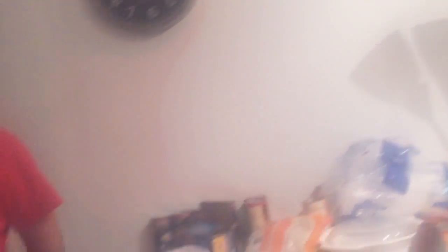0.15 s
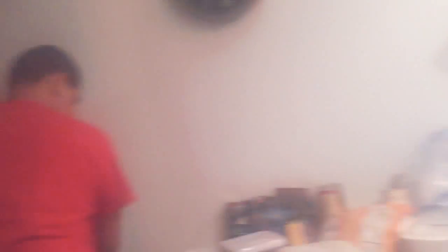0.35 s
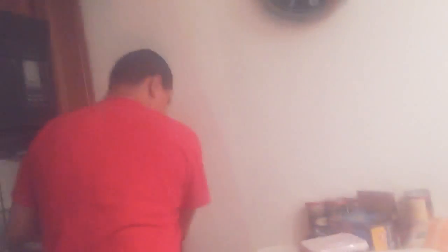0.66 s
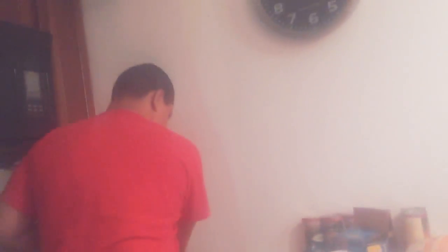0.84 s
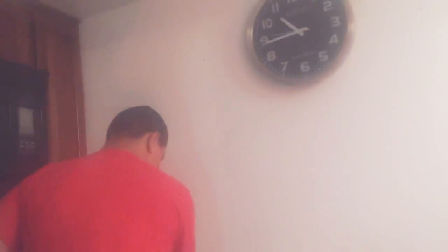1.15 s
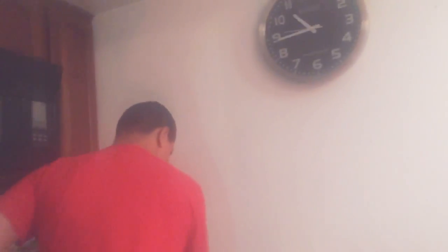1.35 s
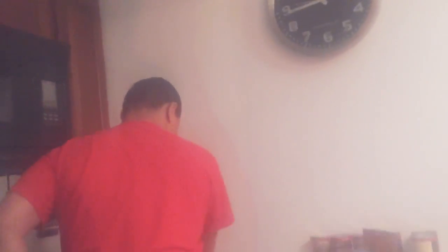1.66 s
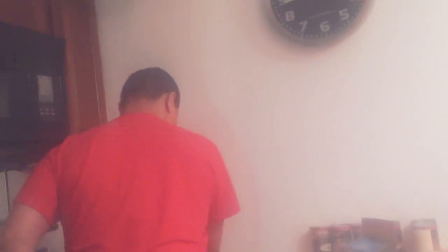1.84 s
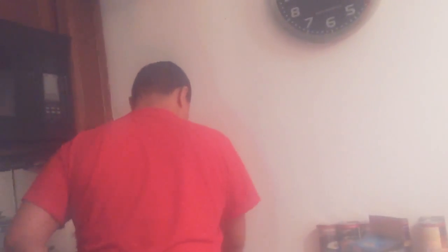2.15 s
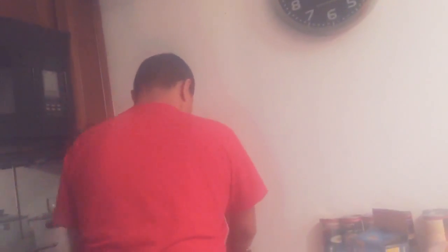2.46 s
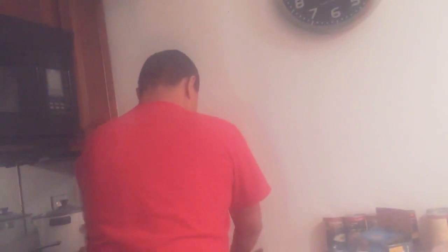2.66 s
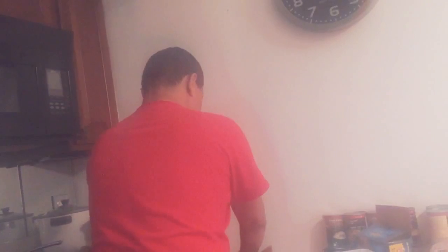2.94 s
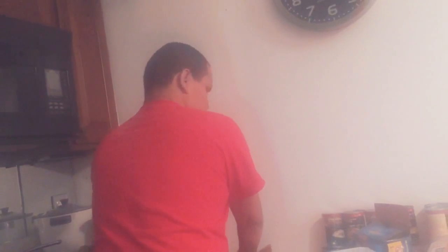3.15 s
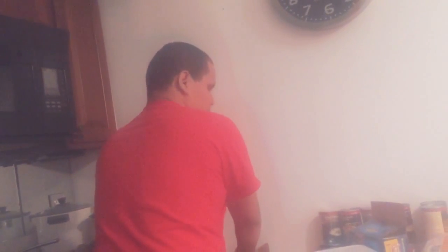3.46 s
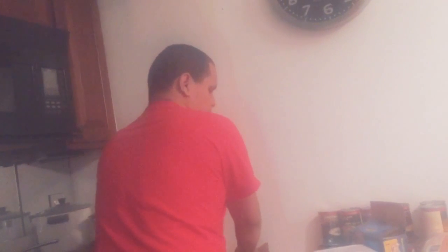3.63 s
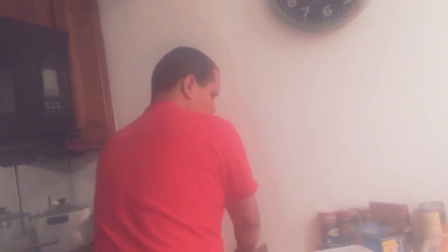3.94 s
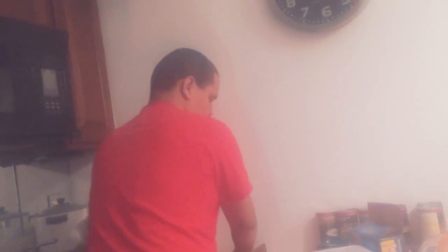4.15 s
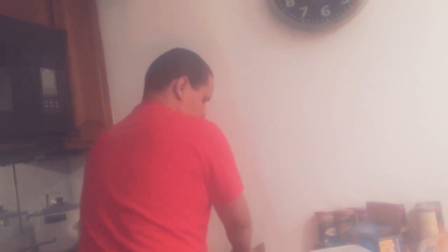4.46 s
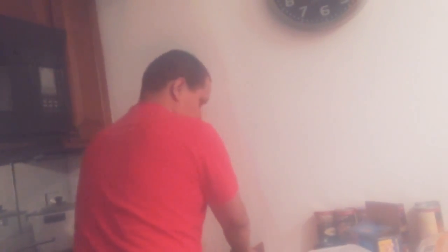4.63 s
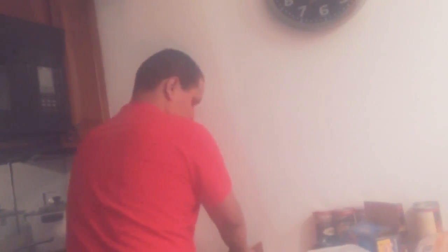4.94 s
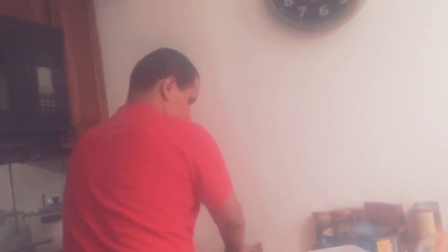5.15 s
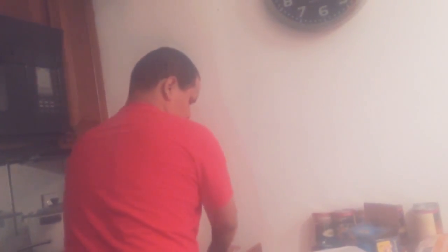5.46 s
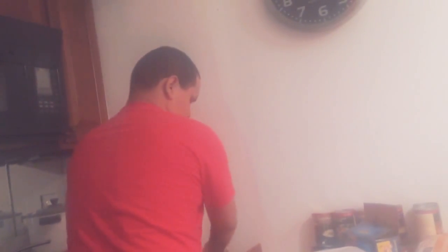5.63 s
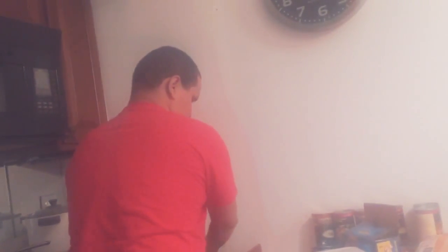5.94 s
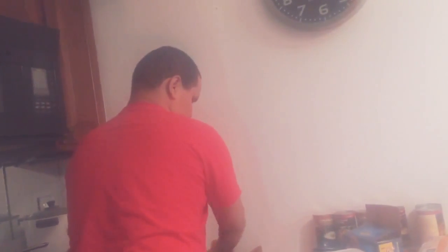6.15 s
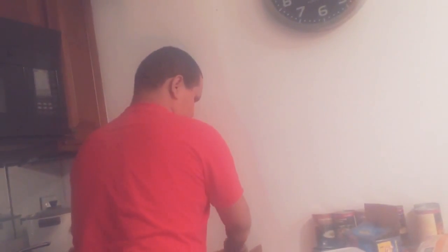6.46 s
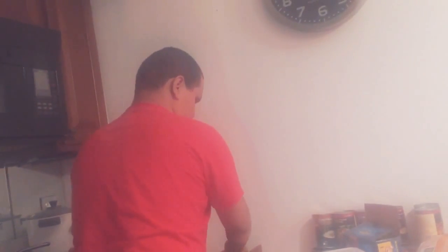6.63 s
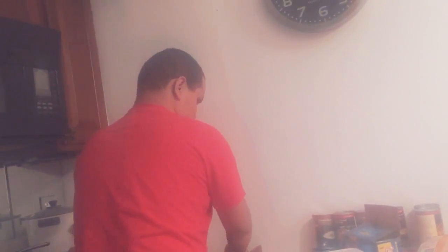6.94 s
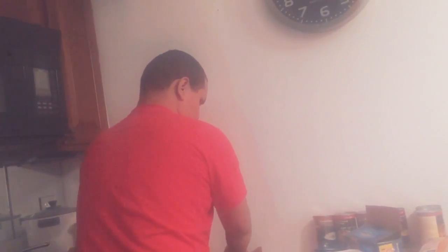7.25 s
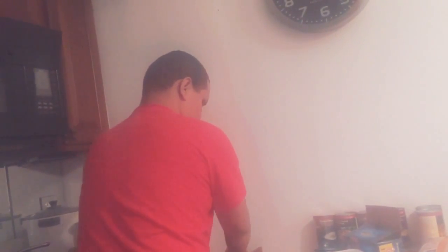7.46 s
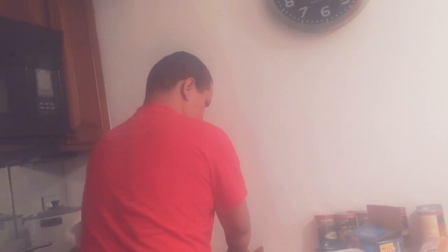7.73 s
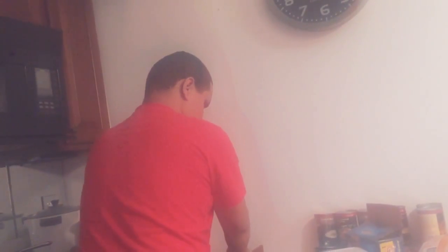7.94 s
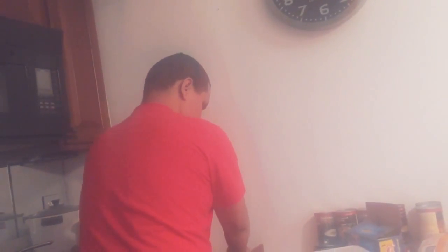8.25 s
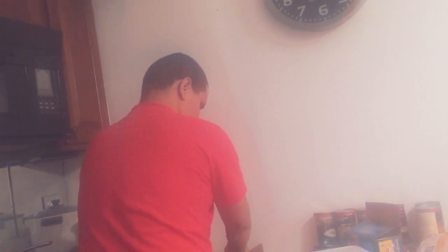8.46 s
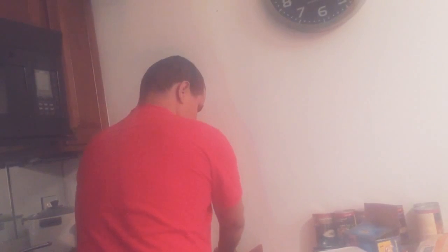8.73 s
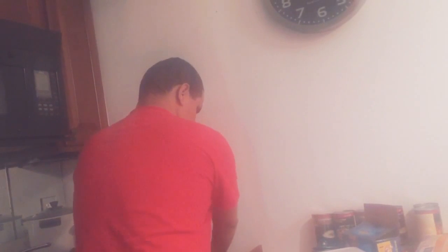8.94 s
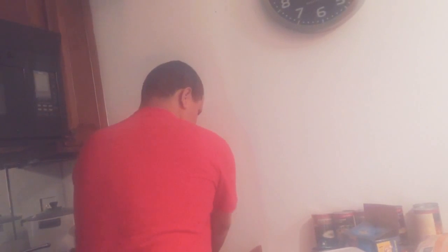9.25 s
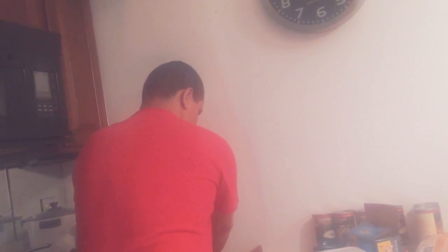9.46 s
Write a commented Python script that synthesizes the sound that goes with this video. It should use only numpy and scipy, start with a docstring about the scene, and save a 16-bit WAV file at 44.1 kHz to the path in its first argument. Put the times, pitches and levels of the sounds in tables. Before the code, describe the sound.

Metal blades clink sharply and handles knock a hard counter in scattered flurries, with brief scrapes and a quiet low hum beneath.

```python
"""Knives on a kitchen counter

Steel knives are sorted and put down in bursts, a few metres away in a small hard-walled room.
Struck blades, handles and counter top are sets of dying sine modes, each with a short crack.
Sine modes also make short single tones and a free ring; shaped noise makes slides; a low sine, cabinet bumps.
An appliance hums underneath: wavering sines over patchy fan noise."""
import sys
import numpy as np
from scipy import signal
from scipy.fft import rfft, irfft, next_fast_len
from scipy.io import wavfile
from scipy.ndimage import uniform_filter1d, map_coordinates

SR = 44100
rng = np.random.default_rng(int(sys.argv[2]) if len(sys.argv) > 2 else 0)


def dump(signal):
    """Clip the signal to [-1, 1] and save it as 16-bit WAV at the path in sys.argv[1]."""
    limited = np.clip(np.atleast_2d(signal).T, -1, 1)
    pcm = np.round(limited * 32767).astype(np.int16)
    wavfile.write(sys.argv[1], SR, pcm)


N = 422919

# Blade clashes: [t/s, blade level/dB, handle clack level/dB, clack f/Hz,
#  level change of the two favoured blade modes/dB, first favoured f/Hz, second favoured f/Hz]
CLINKS = [(1.901, -53.5, -64, 1650.0, -3, 1663.0, 5556.0), (2.372, -61.5, -58.0, 1740, 3, 6686.0, 1663.0),
          (3.04, -42.5, -47, 960.0, 2.5, 9249.0, 13717.0), (3.06, -40.0, -41, 940.0, -8, 9249.0, 13932.0),
          (3.182, -47, -48.5, 1470, -3, 10067.0, 14140.0), (3.464, -54.5, -46.5, 1460, -1, 11445.0, 5787.0),
          (3.521, -58.5, -50, 940.0, 1, 8800.0, 2541.0),
          (3.555, -55.5, -43.5, 1490.0, -2.5, 5556.0, 2541.0),
          (3.584, -29.0, -28.5, 1673, -2, 9990.0, 5556.0), (3.846, -40.5, -40.5, 954, 0, 15073.0, 7200.0),
          (3.876, -32.5, -34, 1750, -0.5, 13600.0, 1836.0),
          (3.902, -34.5, -33.5, 944, -1.5, 7262.0, 9249.0), (3.94, -20, -27, 1790, -0.5, 13717.0, 11310.0),
          (4.033, -36.5, -40, 910, -0.5, 9249.0, 1836.0), (4.063, -37, -34.5, 1802, -1.5, 15073.0, 1836.0),
          (4.384, -63, -55, 920.0, -3, 11919.0, 13717.0), (4.409, -48, -45, 1800.0, 7, 9249.0, 5556.0),
          (4.421, -35.5, -36.5, 1760, -0.5, 9249.0, 5556.0), (4.479, -44, -44, 970.0, 4, 11600.0, 9249.0),
          (4.498, -32, -34.5, 990, 2.5, 9249.0, 11700.0), (4.601, -44.0, -44, 1530.0, -1, 11840.0, 4199.0),
          (4.662, -35.0, -35.5, 1850, -3, 11170.0, 4199.0),
          (4.705, -39, -36.5, 1360.0, -1, 11270.0, 1836.0), (7.23, -57.5, -53.5, 1580, 4, 6900.0, 15073.0),
          (7.261, -51, -46.5, 975, -2, 6700.0, 15073.0), (7.345, -45.5, -39, 1506, 4, 3844.0, 9249.0),
          (7.368, -34, -31, 1510, -9, 12150.0, 9249.0), (7.407, -45, -42.5, 985, 1, 6850.0, 11154.0),
          (7.531, -52.0, -39.5, 1210.0, -0.5, 11445.0, 8550.0),
          (7.541, -34, -33.5, 1780, 2, 8500.0, 11445.0), (7.552, -30.0, -26.5, 958, 0.5, 7300.0, 12600.0),
          (7.567, -22.0, -23, 977, 1, 8581.0, 7070.0), (7.587, -23, -28, 1210, -0.5, 11400.0, 9249.0),
          (7.617, -27.5, -32, 1630.0, 0.5, 8581.0, 12700.0), (7.733, -35.0, -33, 970, 1, 8662.0, 1766.0),
          (7.755, -36.5, -35.5, 1740, -5, 8662.0, 5787.0), (7.8, -43.5, -43, 1680.0, -2, 8800.0, 11445.0),
          (7.835, -46, -42.5, 930, -6, 8662.0, 5556.0), (7.95, -41.5, -39.5, 1180, -2, 11445.0, 9249.0),
          (7.962, -38.5, -33.5, 1140, -0.5, 11445.0, 1766.0), (8.019, -37, -38, 1190, 0, 8662.0, 7041.0),
          (8.066, -31.5, -30.0, 930, -2, 12651.0, 12769.0), (8.11, -56, -40, 930, -2, 12769.0, 14788.0),
          (8.158, -35, -32, 940, -2, 9249.0, 11280.0), (8.189, -32.5, -31, 1190.0, -5, 13932.0, 15073.0)]
# Knives coming down on the counter; handle, blade and counter sound together: [t/s, clack level/dB,
#  blade level over the clack/dB, counter level over the clack/dB, treble slope/dB per octave, clack f/Hz,
#  counter f/Hz, first favoured blade f/Hz, second favoured blade f/Hz]; levels are before the treble slope
KNOCKS = [(1.354, -40.5, -10, -3, 2.5, 1230, 343, 5556.0, 4199.0),
          (1.504, -72.5, -1.5, -12.0, 7.5, 1020.0, 650, 4199.0, 3844.0),
          (2.023, -63.5, -3.5, -12.0, 2.5, 1680.0, 650, 3844.0, 1663.0),
          (2.111, -53.5, -6, -16, -0.5, 1570.0, 650, 3241.0, 3844.0),
          (2.212, -61.5, -3, -3, 0.0, 1430.0, 650, 3844.0, 1663.0),
          (2.296, -52.5, -3, -19, -2.0, 1560.0, 650, 3844.0, 1663.0),
          (2.93, -58.5, -1.0, -1, -0.5, 1440.0, 650, 3844.0, 4199.0),
          (3.023, -28.0, -23, -4, 0.5, 1530, 980, 1766.0, 2670.0),
          (3.056, -35.0, -9, -1.5, 0.0, 1050, 950.0, 3241.0, 4199.0),
          (3.242, -46, -14, -15, 2, 1120, 650, 4813.0, 5787.0),
          (3.77, -41.5, -8, -12, -0.5, 1150, 650, 5556.0, 4199.0),
          (3.917, -29.5, -10.5, -0.5, 2, 1850, 930, 7262.0, 13717.0),
          (4.002, -28.5, -11, -4.5, 1.5, 1830.0, 925, 7262.0, 9249.0),
          (4.535, -37, -25.0, -14, -2.5, 1570, 900, 9249.0, 1836.0),
          (4.641, -41.5, -17.5, -12, -0.5, 1710.0, 650, 1836.0, 4199.0),
          (4.917, -49, -33, -2.5, -2.5, 1020.0, 650, 4199.0, 4840),
          (4.964, -38.5, -27, -2.0, 2, 1170, 830.0, 4199.0, 2993.0),
          (5.868, -44.5, -0.5, -1.5, -2.5, 1230.0, 666, 2541.0, 2970),
          (5.879, -43, -3.5, -4.5, -2, 1520, 690.0, 2541.0, 2670.0),
          (5.946, -52.0, -4.5, -3, 0.5, 1700, 650, 3241.0, 3844.0),
          (6.006, -54, -3.5, -1.5, 0.0, 1910, 650, 3844.0, 8075.0),
          (7.229, -47.5, -10, -5.5, -1, 1530.0, 980, 5556.0, 1766.0),
          (7.404, -35, -6, -3, -2.5, 1130, 970, 6686.0, 9249.0),
          (7.589, -27, -6.5, -15, 10.5, 1250, 950, 7203.0, 8581.0),
          (8.229, -29.5, -5.5, 0, 1, 1610.0, 940, 4813.0, 5500),
          (8.255, -35.5, -4.5, 1.5, 0.5, 1730, 610.0, 4813.0, 11370.0),
          (8.372, -40.5, -30.0, 0.5, 3, 1260, 700, 2670.0, 3844.0),
          (8.42, -39.5, -32.0, 3, -2.5, 1620, 563, 2670.0, 3844.0),
          (8.722, -43.5, -27, 4.5, 1.5, 1530, 905, 1663.0, 4813.0),
          (8.765, -52.0, -28.0, 7.5, -10, 1020.0, 850.0, 2670.0, 1766.0),
          (8.812, -43.5, -5, 2, -3, 1020.0, 990.0, 3844.0, 1740),
          (8.906, -23.0, -9, -3.5, -1, 1490, 730.0, 11445.0, 14788.0),
          (8.935, -31, -4, -1, -1, 1540, 600.0, 11445.0, 7262.0),
          (8.993, -28, -5.5, -5.5, -1, 1870, 1020, 9249.0, 1836.0),
          (9.348, -49.0, -4, -11.0, 0.5, 1180, 650, 6686.0, 6200),
          (9.371, -43, -28.0, 0.5, -2, 1170, 1020, 2670.0, 1836.0),
          (9.455, -46.5, -6.5, -11, 2, 1490, 650, 9249.0, 3241.0),
          (9.486, -50.5, -15.0, 3.5, -3, 1780.0, 302, 3241.0, 2541.0)]
# Resonances of the blades: [f/Hz, relative level/dB, t60 before contact damping/s]
BLADES = [(1663, -14, 0.16), (1766, -14, 0.16), (1836, -12, 0.17), (2541, -10, 0.12), (2670, -7, 0.14),
          (2993, -9, 0.12), (3241, -10, 0.13), (3844, -5, 0.12), (4199, -4, 0.16), (4813, -3, 0.14),
          (4985, -9, 0.15), (5394, -8, 0.13), (5556, -2, 0.14), (5787, -9, 0.12), (6234, -10, 0.12),
          (6686, -6, 0.13), (6767, -10, 0.14), (7041, -11, 0.13), (7203, -4, 0.13), (7262, -6, 0.14),
          (7677, -13, 0.12), (8075, -11, 0.12), (8581, -3, 0.11), (8662, -8, 0.13), (8753, -5, 0.13),
          (9249, -1, 0.13), (9938, -7, 0.1), (10067, -6, 0.1), (10637, -9, 0.11), (11154, -7, 0.12),
          (11370, -3, 0.12), (11445, -3, 0.13), (11542, -4, 0.15), (11811, -6, 0.13), (11919, -6, 0.12),
          (12651, -4, 0.13), (12769, -3, 0.12), (13717, -2, 0.11), (13932, -7, 0.11), (14788, -9, 0.1),
          (15073, -6, 0.12)]
# Resonances of handles and the surface they hit: [f/Hz, relative level/dB, t60 before contact damping/s]
HANDLES = [(856, -3, .2), (978, 1, .25), (1128, -3, .2), (1213, -1, .28), (1298, -4, .2), (1354, -3, .2),
           (1510, -5, .2), (1598, -3, .22), (1715, -5, .25), (1770, -6, .25), (1838, -2, .32),
           (2190, -14, .16)]
# Resonances of the counter top: [f/Hz, relative level/dB, t60 before contact damping/s]
COUNTER = [(320, -4, .2), (395, -9, .15), (530, 0, .17), (599, 0, .25), (646, -3, .2), (725, -1, .25)]
# Spectra of the dense, fast-dying vibrations of blade, handle and counter: [f/Hz, relative level/dB per Hz]
BLADE_CRACK = [(1200, -33.5), (2300, -1.5), (3400, 3.5), (4500, 3.5), (6300, 0.5), (9000, -1.5),
               (10500, -4.5), (11600, -6.5), (14000, 2), (15300, -15), (16200, -22)]
HANDLE_CRACK = [(450, -28), (750, -3), (950, 1), (1400, 4.5), (1850, 2), (2100, -3), (2800, -14.5),
                (5000, -19.5), (12000, -42.5)]
COUNTER_CRACK = [(60, -47), (130, -5), (190, 4), (320, -4), (450, 3), (600, -3.5), (780, 4.5),
                 (1100, -21.5), (3000, -50.5)]
# Short single tones: tiny ticks, bright edges of a knock and scrape, brief rings: [t/s, level/dB, f/Hz, t60/s]
SINGLE_TONES = [(0.712, -69, 3870, .03), (0.924, -67, 3860, .025), (1.356, -51.5, 6300, .003),
                (1.906, -54, 1663, 0.18), (2.296, -61.5, 3736, .012), (2.55, -69, 3500, 0.0027),
                (2.785, -70, 3900, 0.0028), (2.81, -71, 4700, .003), (7.231, -60.5, 3241, .05),
                (7.262, -53.5, 1796, .15), (8.624, -67.5, 3950, .01), (8.645, -64, 3330, .008),
                (9.465, -64, 3190, .02), (9.48, -60, 3600, 0.013)]
# Modes of a long knife that lies free and rings on: [f/Hz, relative level before scatter/dB, t60/s]
FREE_BLADE = [(4231, 0, .36), (5582, 1, .28), (7262, -8, .22)]
# When the free knife is set ringing: [t/s, starting level before build-up and flutter/dB]
FREE_RINGS = [(4.965, -64), (5.872, -52), (8.913, -30.5)]
# Things pushed along the counter, ever harder, then let go: [start t/s, length t/s, fade time constant/s,
#  then at the height of the push: handle scrape level/dB, steel hiss level/dB, counter rumble level/dB]
SLIDES = [(1.596, 0.28, 0.22, -56, -79, -51), (2.695, 0.28, 0.12, -58, -70, -56.5),
          (7.153, 0.23, 0.13, -50, -57.5, -62), (8.32, 0.2, 0.086, -51, -65.5, -49),
          (8.601, 0.053, 0.04, -62, -67, -63), (8.741, 0.2, 0.12, -44, -54, -53),
          (8.84, 0.047, 0.076, -44.5, -46, -51), (9.264, 0.095, 0.075, -68.5, -59, -53)]
# Spectra of hissing steel and of the counter under a dragged weight: [f/Hz, relative level/dB per Hz]
STEEL_HISS = [(1000, -32), (3000, 1), (7000, -5.5), (15000, -11.5)]
RUMBLE = [(100, -23.5), (230, -0.5), (350, -0.5), (480, -10), (900, -22), (3000, -63)]
# Dull bumps of the cabinet: [t/s, level before build-up and doubling/dB]
BUMPS = [(1.13, -49), (3.03, -35.5), (5.18, -56.5)]
# Tones of the appliance: [f/Hz, level/dB, waver depth/dB]
HUM = [(117, -60.5, 2), (120, -61.5, 2), (155.3, -44.4, .8), (177, -62, 3), (233, -62.5, 3), (240, -65, 3),
       (340, -67, 4), (646, -67, 4.5), (823, -72, 4), (978, -73, 4)]
# Spectrum of its fan and the room: [f/Hz, relative level/dB per Hz]
AIR = [(20, -25.5), (60, -8.5), (100, -7), (130, 7.5), (200, -4), (320, -4), (400, -9.5), (520, -16.5),
       (680, -12.5), (830, -15.5), (1150, -20), (1750, -20.5), (2150, -30.5), (2600, -33.5), (5000, -38),
       (16000, -47)]
# Kitchen reverberation, before the tail is shaped further: [f/Hz, t60/s]
ROOM = [(100, 0.48), (500, 0.29), (1800, 0.4), (5000, 0.33), (15000, 0.25)]

TOP_HZ = 16000  # band limit, and the reference frequency of the blade's treble slope
RING_SAMPLES = 16384  # longest single sound
AIR_DB = -50

# Blade hardness: reference strength, its treble slope in dB per octave, rise of slope per dB of strength
FIRM_DB, FIRM_SLOPE, SLOPE_PER_DB = -29, -0.5, 0.2
SHAKEN_SLOPE = -5.5  # slope change, dB per octave, when a blade is only shaken through its handle

CLINK_COUNTER_DB = -7  # the counter's level against the clack
# Rise of the echoes: blades chatter as they meet, a handle lands at once
CLINK_BUILD_S, KNOCK_BUILD_S = 0.0039, 0.00031
CHATTER_GROWS = 0.26  # dB longer build-up per dB of strength: a light touch is a single tick
CLINK_DIRECT_DB, KNOCK_DIRECT_DB = -14, -9.5  # direct sound against its echoes

# The two favoured blade modes: levels before each blow's change; ring time over the usual one
LEAD_DB, SECOND_DB, LEAD_LIFE = 5, 2.5, 1.4
HELD_LEAD_DB, HELD_LEAD_LIFE = -4.5, 1.15  # hand-damped: level change; ring time over the usual one
LOOSE_CRACK_DB, HELD_CRACK_DB = -3.5, 3  # blade crack against its ring: lying loose; held

# How long each part takes to start moving
BLADE_TOUCH_S, HANDLE_TOUCH_S, COUNTER_TOUCH_S = 0.00055, 0.0007, 0.0014
# The best-hit resonance of handle and of counter: added share, width
CLACK_PEAK_DB, CLACK_PEAK_WIDTH_HZ = 1.5, 128
COUNTER_PEAK_DB, COUNTER_PEAK_WIDTH_HZ = 0, 110
TOUCH_KNEE_HZ = 1620  # a landing's treble slope acts above this
FREE_BUILD_S = 0.017  # the free ring builds up in the room
CEILING, CEILING_KNEE = 0.38, 3.2  # limit of the sample value; how abruptly it is reached


def clinks():
    """Blades clash in bursts; the harder they meet, the brighter they ring and the longer they chatter."""
    track = np.zeros(N)
    for s, db, clack_db, clack_hz, lead_db, *lead_hz in CLINKS:
        build_s = CLINK_BUILD_S * amp(CHATTER_GROWS * (db - FIRM_DB))
        path = kitchen(CLINK_DIRECT_DB, build_s)
        peaks = [(clack_hz, CLACK_PEAK_WIDTH_HZ, CLACK_PEAK_DB)]
        modes = blade_modes(lead_hz, lead_db, held=False)
        counter_db = clack_db + CLINK_COUNTER_DB
        clink = contact(clack_db, db, counter_db, hardness(db), modes, peaks, path, LOOSE_CRACK_DB)
        add(track, s, clink)
    return track


def knocks():
    """Handles land softly or sharply, each on its own spot of the counter; blades ring along, dully."""
    track = np.zeros(N)
    for s, db, ring_over, counter_over, treble_db, clack_hz, counter_hz, *lead_hz in KNOCKS:
        path = kitchen(KNOCK_DIRECT_DB, KNOCK_BUILD_S)
        peaks = [(clack_hz, CLACK_PEAK_WIDTH_HZ, CLACK_PEAK_DB),
                 (counter_hz, COUNTER_PEAK_WIDTH_HZ, COUNTER_PEAK_DB)]
        modes = blade_modes(lead_hz, HELD_LEAD_DB, held=True)
        blade_db = db + ring_over
        slope = hardness(blade_db) + SHAKEN_SLOPE
        knock = contact(db, blade_db, db + counter_over, slope, modes, peaks, path, HELD_CRACK_DB)
        # a soft landing loses treble, a sharp one gains it
        landed = filtered(knock, lambda f: amp(treble_db * np.log2(np.maximum(f / TOUCH_KNEE_HZ, 1))))
        add(track, s, landed)
    return track


def contact(clack_db, blade_db, counter_db, slope, modes, peaks, path, blade_crack_db):
    """One contact rings handle, blade and counter; knives that lie on each other damp quickly."""
    blade = struck(modes, BLADE_CRACK, BLADE_TOUCH_S,
                   crack_db=blade_crack_db, scatter_db=3.5, damping=3.3, slope=slope)
    handle = struck(HANDLES, HANDLE_CRACK, HANDLE_TOUCH_S, crack_db=4.0, scatter_db=2.5, damping=2.64)
    counter = struck(COUNTER, COUNTER_CRACK, COUNTER_TOUCH_S, crack_db=0.5, scatter_db=3.5, damping=2.2)
    body = heard(handle, path, clack_db) + heard(counter, path, counter_db)
    return heard(blade, path, blade_db) + favoured(body, peaks)


def blade_modes(lead_hz, change_db, held):
    """The place of the blow favours two blade modes, which ring longer; a held knife prolongs them less."""
    modes = np.array(BLADES, float)
    life = HELD_LEAD_LIFE if held else LEAD_LIFE
    for hz, db in zip(lead_hz, (LEAD_DB, SECOND_DB)):
        nearest = np.argmin(abs(modes[:, 0] - hz))
        modes[nearest, 1:] = db + change_db, life * BLADES[nearest][2]
    return modes


def hardness(blade_db):
    """Treble slope in dB per octave: a harder blow is shorter and so brighter."""
    return FIRM_SLOPE + SLOPE_PER_DB * (blade_db - FIRM_DB)


def struck(modes, spectrum, touch_s, crack_db, scatter_db, damping, slope=0):
    """A struck part: decaying modes, their strengths scattered by where it is hit, and a short crack."""
    t = np.arange(RING_SAMPLES // 2, dtype=np.float32) / SR
    hz, db, t60 = np.transpose(modes).astype(np.float32)[:, :, None]
    db = db + scatter_db * rng.standard_normal(hz.shape)
    phase = rng.uniform(0, 2 * np.pi, hz.shape).astype(np.float32)
    decay = np.exp(-6.908 * damping * t / t60)  # 6.908 = ln(1000), a 60 dB fall
    ring = amp(db[:, 0]) @ (decay * np.sin(2 * np.pi * hz * t + phase))
    onset = 1 - np.exp(-t / touch_s)
    sound = unit(ring * onset) + amp(crack_db) * unit(snap(spectrum, size=len(t)))
    if not slope:
        return sound
    # a harder contact is shorter and reaches higher modes
    return filtered(sound, lambda f: amp(slope * np.log2(np.clip(f, 2500, TOP_HZ) / TOP_HZ)))


def snap(spectrum, size):
    """The shortest causal pulse with the given spectrum: minimum phase, by folding the cepstrum."""
    cepstrum = irfft(np.log(amp(along(spectrum, np.fft.rfftfreq(size, 1 / SR)))))
    cepstrum[1:size // 2] *= 2
    cepstrum[size // 2 + 1:] = 0
    return irfft(np.exp(rfft(cepstrum)))


def favoured(x, peaks):
    """x with its energy drawn towards the (Hz, width Hz, dB) resonances, at the same level."""
    def resonances(f):
        gain = 1
        for hz, width, db in peaks:
            gain = gain + amp(db) * 1j * f * width / (hz * hz - f * f + 1j * f * width)
        return gain
    return unit(filtered(x, resonances)) * np.std(x)


def single_tones(tick_db=-7):
    """Tiny ticks, bright edges of a knock and scrape, brief rings: one decaying sine with a short pulse."""
    t = np.arange(RING_SAMPLES // 2) / SR
    track = np.zeros(N)
    tick = amp(tick_db) * unit(snap(STEEL_HISS, size=len(t)))
    for s, db, hz, t60 in SINGLE_TONES:
        tone = unit(amp(-60 * t / t60) * np.sin(2 * np.pi * hz * t)) + tick
        add(track, s, heard(tone, kitchen(KNOCK_DIRECT_DB, KNOCK_BUILD_S), db))
    return track


def free_knife():
    """Nothing damps this blade, so its few low modes sing on, with a fluttering level."""
    t = np.arange(RING_SAMPLES) / SR
    track = np.zeros(N)
    for s, db in FREE_RINGS:
        ring = 0
        for hz, level, t60 in FREE_BLADE:
            decay = amp(level + rng.normal(0, 1) - 60 * t / t60)
            ring = ring + decay * np.sin(2 * np.pi * hz * t)
        add(track, s, amp(db) * ring * (1 - np.exp(-t / FREE_BUILD_S)))
    return track * amp(2 * wobble(60))


def sliding():
    """Each push swells and fades: handles scrape unevenly, steel hisses, the counter rumbles."""
    t = np.arange(N) / SR
    pushes = []
    for s, length, fade, *_ in SLIDES:
        swell = np.clip((t - s) / length, 0, 1)
        pushes.append(swell * np.exp(-np.maximum(t - s - length, 0) / fade))
    scrape, hiss, rumble = amp(np.array(SLIDES)[:, 3:]).T @ np.array(pushes)
    grip = amp(5.5 * wobble(110) + 2.5 * wobble(12))

    def rubbed(spectrum):
        return coloured(grip * noise(spectrum, size=N))
    return scrape * rubbed(HANDLE_CRACK) + hiss * rubbed(STEEL_HISS) + rumble * rubbed(RUMBLE)


def cabinet(boom_hz=72, t60=0.25):
    """The cabinet under the counter booms briefly when it is bumped: one low decaying mode."""
    t = np.arange(RING_SAMPLES) / SR
    boom = (1 - np.exp(-t / 0.0089)) * np.sin(2 * np.pi * boom_hz * t) * 2
    track = np.zeros(N)
    for s, db in BUMPS:
        add(track, s, amp(db - 60 * t / t60) * boom)
    return track


def appliance():
    """A motor's strong steady tone and weak wavering ones over the soft rush of its fan."""
    t = np.arange(N) / SR
    hum = 0
    for hz, db, waver_db in HUM:
        # deeper waver also means more phase drift
        phase = 2 * np.pi * hz * t + waver_db * (.15 * wobble(9) + .5 * wobble(1.2))
        hum = hum + amp(db) * unit(amp(waver_db * wobble(7)) * np.sin(phase))
    fan = patchy(coloured(noise(AIR, size=N)), depth_db=2.5)
    return hum + amp(AIR_DB + 1.6 * wobble(3.7)) * fan


def patchy(x, depth_db):
    """x with soft patches of random gain, each a few hundred Hz wide and about a tenth of a second long."""
    hz, t, z = signal.stft(x, SR, nperseg=1024)
    across_hz = uniform_filter1d(rng.standard_normal(z.shape), size=5, axis=0)
    field = uniform_filter1d(across_hz, size=9, axis=1)
    reach = along([(150, 0), (300, 1), (2000, 1), (6000, .3)], hz)[:, None]  # patch depth by (Hz, share)
    return unit(signal.istft(z * amp(depth_db * reach * unit(field)), SR, nperseg=1024)[1][:N])


def kitchen(direct_db, build_s, early=0.96, early_s=0.021, clump_db=3, clump_s=.0015, even=0.67):
    """One path through the room: direct sound, then clumped echoes in a dying tail, partly evened in colour."""
    hz, t, z = signal.stft(rng.standard_normal(RING_SAMPLES), SR, nperseg=256)
    dying = z * amp(-60 * t / along(ROOM, hz)[:, None])
    tail = signal.istft(dying, SR, nperseg=256)[1][:RING_SAMPLES]
    age = np.arange(RING_SAMPLES) / SR
    knots = rng.standard_normal(RING_SAMPLES)
    clumps = amp(clump_db * np.interp(age / clump_s, np.arange(RING_SAMPLES), knots))
    build = 1 - np.exp(-age / build_s)
    near_walls = 1 + early * np.exp(-age / early_s)
    z = rfft(tail * clumps * build * near_walls)
    smooth_power = abs(uniform_filter1d(abs(z) ** 2, size=110))
    tail = irfft(z / smooth_power ** (even / 2)) * (1 - age / age[-1]) ** .5
    tail /= np.linalg.norm(tail)
    tail[0] += amp(direct_db)
    return tail


def heard(sound, path, db):
    """The sound after its path through the room; db is the rms of its energy spread over 40 ms."""
    wet = signal.fftconvolve(sound, path)[:RING_SAMPLES]
    return amp(db) * wet / np.sqrt(np.sum(wet ** 2) / (.04 * SR))


def coloured(x):
    """A lasting sound takes on the fine peaks and dips of the room."""
    return unit(signal.fftconvolve(x, kitchen(direct_db=2, build_s=.002))[:N])


def noise(spectrum, size):
    """Noise of rms 1 with the given spectrum."""
    return unit(filtered(rng.standard_normal(size), lambda hz: amp(along(spectrum, hz))))


def wobble(rate):
    """A smooth random curve, rate knots a second."""
    knots = rng.standard_normal(int(N * rate / SR) + 4)
    steps = np.arange(0, N, 48)  # drawn coarsely, then joined by straight lines
    return np.interp(np.arange(N), steps, map_coordinates(knots, [steps * rate / SR]))


def filtered(x, gain):
    """x times a gain that depends on frequency."""
    m = next_fast_len(len(x) + 2048, True)
    return irfft(rfft(x, m) * gain(np.fft.rfftfreq(m, 1 / SR)), m)[:len(x)]


def along(points, hz):
    """(Hz, value) points read on a log frequency axis."""
    f, v = np.transpose(points)
    return np.interp(np.log(hz + 1), np.log(f + 1), v)


def amp(db):
    """Decibels to gain."""
    return 10 ** (np.asarray(db) / 20)


def unit(x):
    """x at rms 1."""
    return x / np.sqrt(np.mean(x ** 2) + 1e-20)


def add(track, s, sound):
    """Mix a sound into the track at time s."""
    part = track[max(round(s * SR), 0):][:len(sound)]
    part += sound[:len(part)]


def scene():
    """Knives and counter over the hum, in one channel."""
    knives = clinks() + knocks() + single_tones() + free_knife()
    return (knives + sliding() + cabinet() + appliance())[None]


def record(dry):
    """The microphone rolls off deep bass; the recorder rounds high peaks and cuts all above its band limit."""
    thin = signal.sosfilt(signal.butter(3, 50, "highpass", fs=SR, output="sos"), dry[0])
    rounded = thin / (1 + abs(thin / CEILING) ** CEILING_KNEE) ** (1 / CEILING_KNEE)
    return filtered(rounded, lambda hz: hz < TOP_HZ)[None]


dry = scene()
out = record(dry)
dump(out)
```